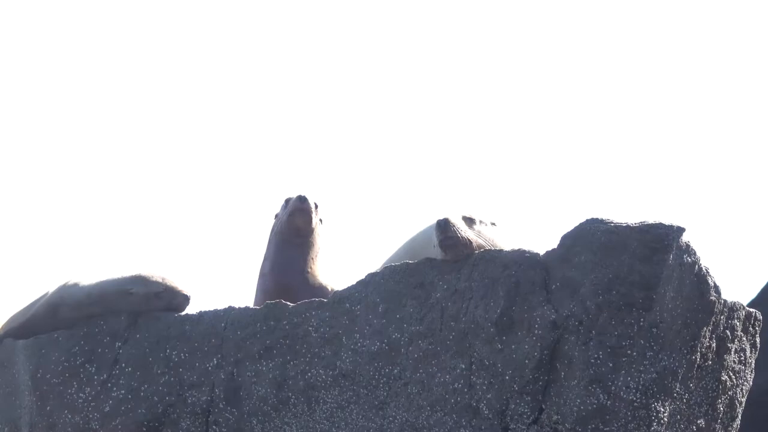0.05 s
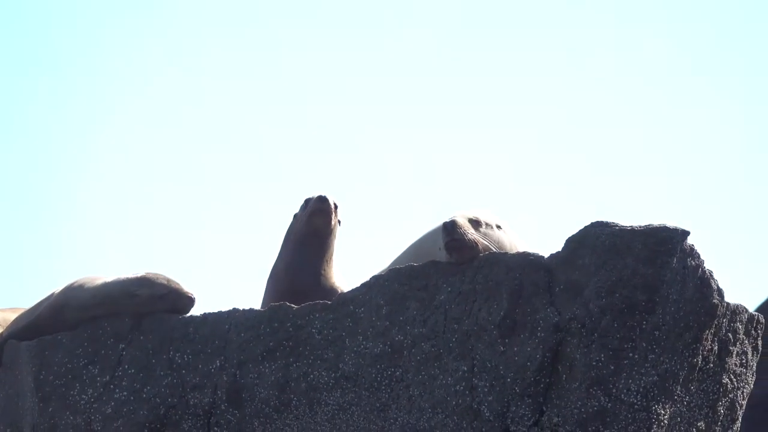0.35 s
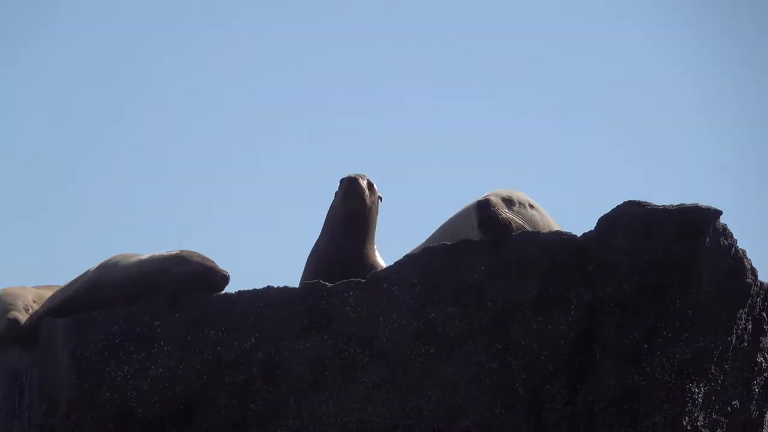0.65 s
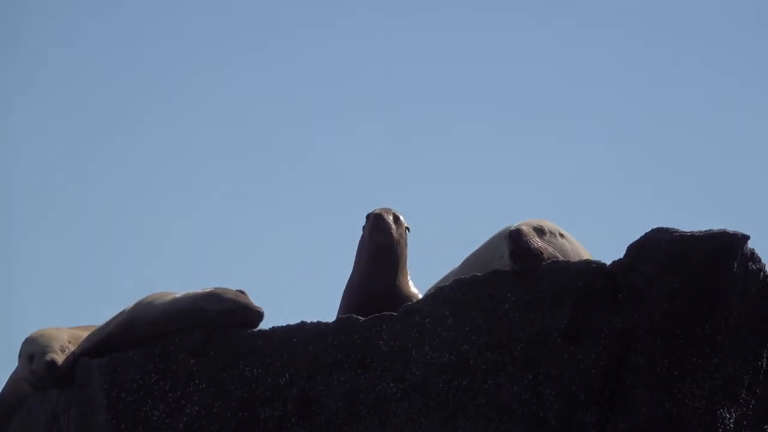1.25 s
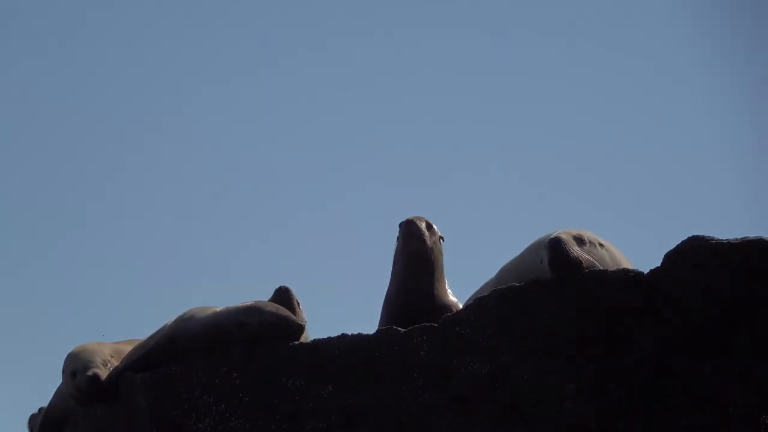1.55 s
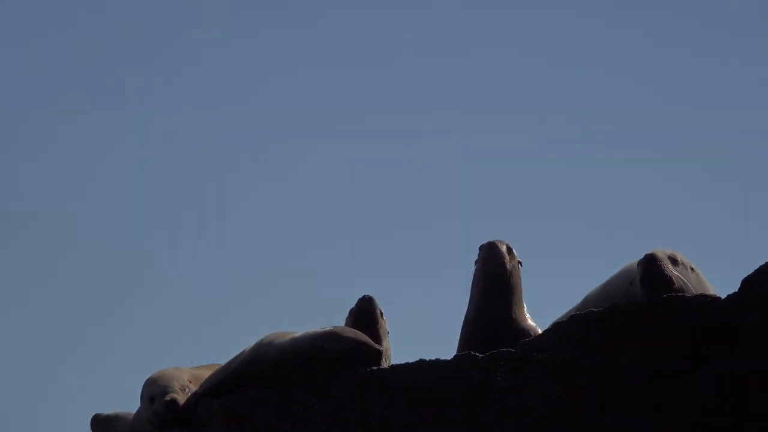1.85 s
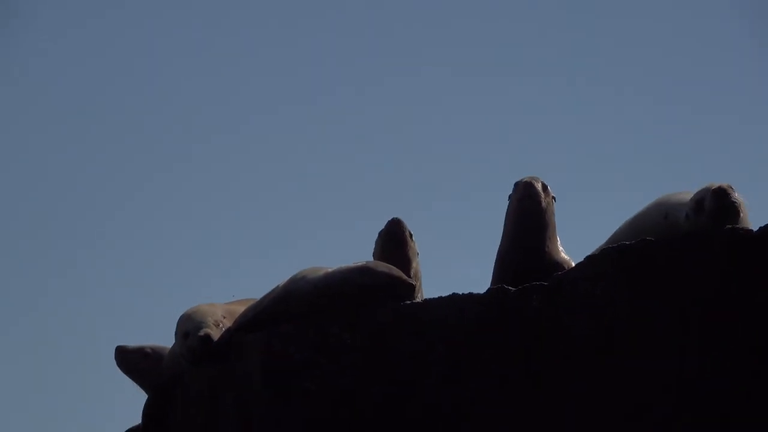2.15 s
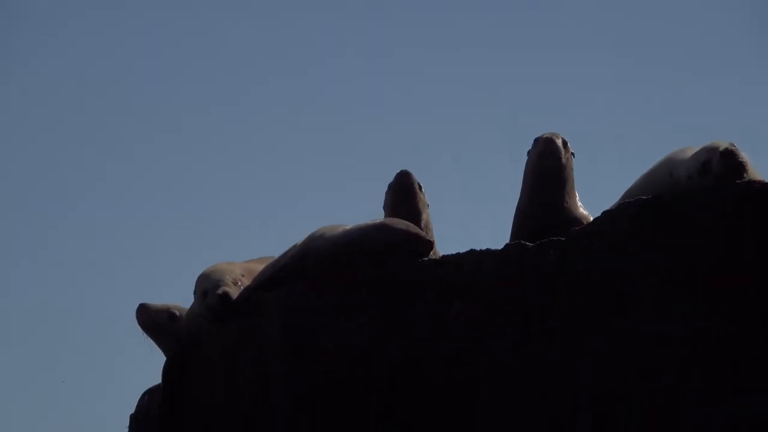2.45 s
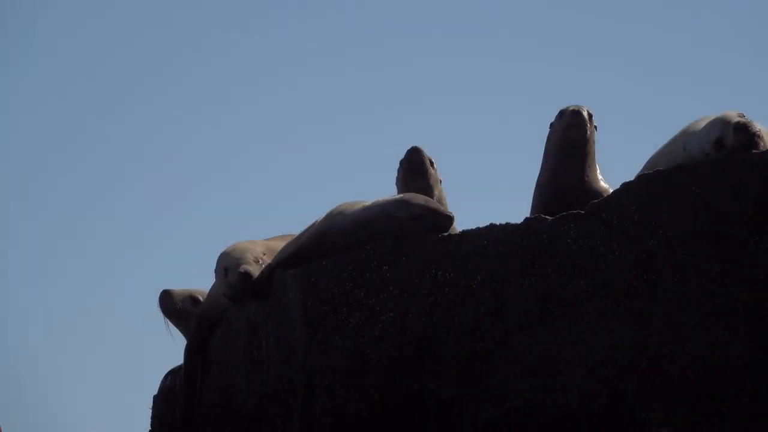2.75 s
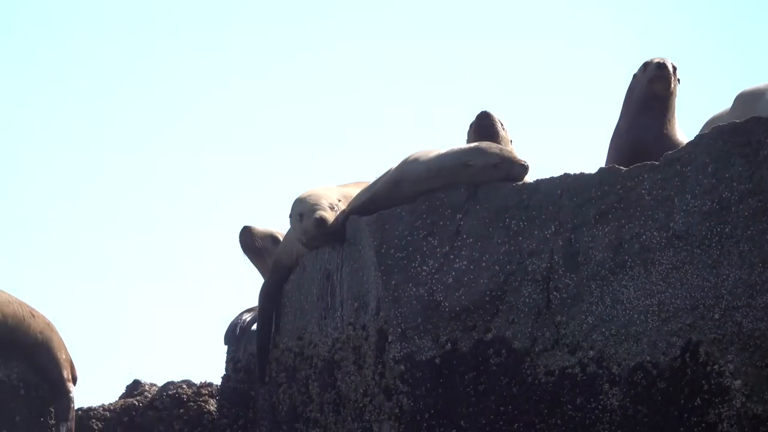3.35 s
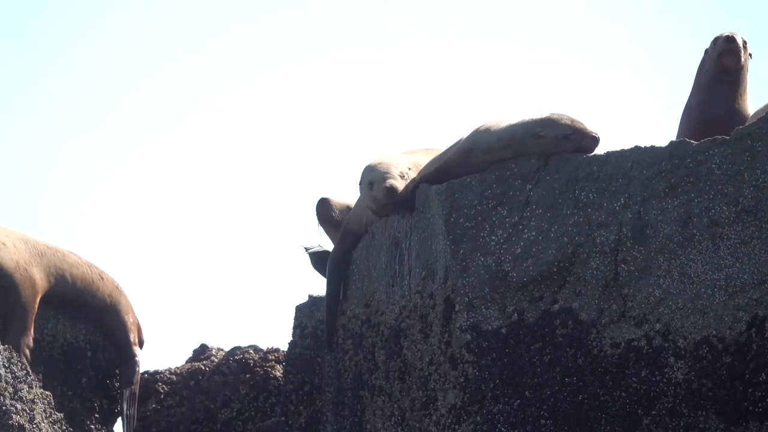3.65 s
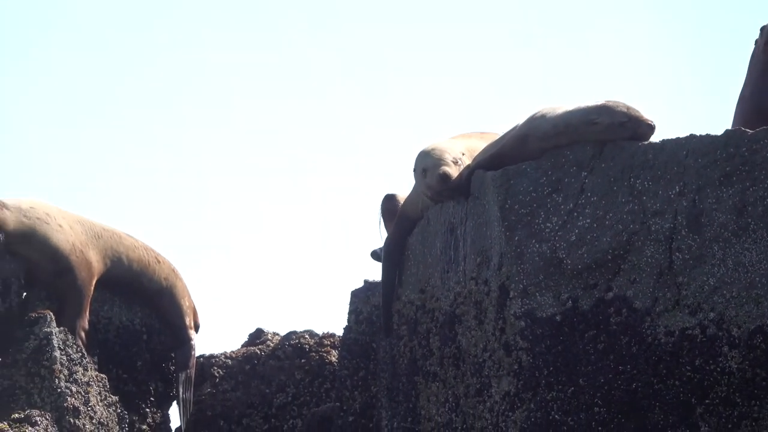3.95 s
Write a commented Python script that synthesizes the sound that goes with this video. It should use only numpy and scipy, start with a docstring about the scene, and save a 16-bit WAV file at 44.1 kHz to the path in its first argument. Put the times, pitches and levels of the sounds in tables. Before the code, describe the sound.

A boat engine idles throughout, heard from aboard, its low burbling exhaust swelling and sinking with irregular chugs and deep glugs. Water washes and gulps at the hull from the start, over faint foam hiss and light wind. Small splashes come between about 1.2 and 2.3 seconds. Wavelets slap the hull four times from 2.2 to 2.8 seconds, then the chugging idle carries on until 4 seconds.

```python
"""Aboard a boat idling close to sea rocks. From the start a wet exhaust swells and sinks as the hull
rocks, with a faint whirr above it, over a bed of wash, foam, churn, thin hiss and breeze. At once water
gulps at the hull, the engine chugs and air pockets glug; all three keep coming back. Spray first
sizzles at 0.6 s, and small splashes come in just after 1 s. Between 2.2 and 2.8 s wavelets slap the
hull four times, then the idle carries on with a few more chugs and glugs."""
import sys
import numpy as np
from scipy import signal
from scipy.fft import rfft, irfft
from scipy.io import wavfile

SR = 44100
rng = np.random.default_rng(int(sys.argv[2]) if len(sys.argv) > 2 else 0)


def to_wav(sig):
    """Store sig (one row per channel, or 1-D mono) as 16-bit WAV at the path in sys.argv[1].

    Samples outside -1..1 are clipped; the rate is SR.
    """
    pcm = np.clip(np.atleast_2d(sig), -1, 1) * 32767
    pcm = np.round(pcm).astype(np.int16)
    wavfile.write(sys.argv[1], SR, pcm.T)  # frames by channels


N = 176400
T = np.arange(N) / SR
HZ = np.maximum(np.arange(N // 2 + 1) * SR / N, 1)
SIDES = np.array([[1], [-1]])   # left, right
FIRING_HZ = 43.0
ENGINE_PAN_DB, HULL_PAN_DB, PHASE_SPREAD_RAD = 2.0, -3.5, 1.1


def from_db(db):
    """Decibels to gain."""
    return 10 ** (np.asarray(db) / 20)


def rms_one(x):
    """Scale to unit rms."""
    return x / np.sqrt(np.mean(x ** 2) + 1e-20)


def in_time(rows):
    """A fader ride read at every sample."""
    return np.interp(T, *np.transpose(rows))


def at_hz(points):
    """An EQ curve read at every frequency."""
    hz, db = np.transpose(points)
    return np.interp(np.log(HZ), np.log(hz), db)


def colour(points):
    """Gain by frequency, rolling off beyond the ends of an EQ curve."""
    inside = np.minimum(HZ / points[0][0], points[-1][0] / HZ)
    return from_db(at_hz(points)) * np.minimum(1, inside) ** 2


def peak(hz, width_hz):
    """Gain by frequency of a resonance."""
    return 1 / (1 + 2 * ((HZ - hz) / width_hz) ** 2)


def pan(db):
    """Left and right gains for a left-minus-right level."""
    return from_db(SIDES * db / 2)


def drift(rate_hz):
    """Slow random wobble of unit rms."""
    return rms_one(irfft(rfft(rng.standard_normal(N)) / (1 + (HZ / rate_hz) ** 2), N))


def ring(clicks, hz, t60):
    """Clicks set a damped resonance ringing."""
    r, w = from_db(-60 / (t60 * SR)), 2 * np.pi * hz / SR
    return signal.lfilter([1, -r * np.cos(w)], [1, -2 * r * np.cos(w), r * r], clicks + 1e-18)


def swell(age, width_s):
    """Smooth rise and fall round age zero."""
    return np.exp(-np.minimum((age / width_s) ** 2, 50))


def burst(age, attack_s, t60):
    """Quick attack, exponential tail."""
    age = np.maximum(age, 0)
    return (1 - np.exp(-age / attack_s)) * from_db(-np.minimum(60 * age / t60, 200))


# Stereo width of the ambience: f/Hz, side minus mid/dB
STEREO_WIDTH = [(60, -12.5), (130, -6.5), (240, 1), (350, -7.5), (620, -3), (800, -12.5), (1500, -10),
                (2200, -3), (3500, -2), (5500, 4), (8000, -2), (10500, -9.5), (15000, -4)]
# Its balance: f/Hz, left minus right/dB
STEREO_LEAN = [(80, -2), (170, -3.5), (250, 3.5), (360, -5), (500, 0.5), (700, -3), (1450, 0), (1850, -3),
               (6000, -2), (11000, -1)]
def diffuse(gain):
    """Stereo noise of a given colour, arriving from all round; unit rms."""
    mid, side = rfft(rng.standard_normal((2, N)))
    width = from_db(at_hz(STEREO_WIDTH))
    spread = (mid + width * side * SIDES) / np.sqrt(1 + width ** 2)
    return rms_one(irfft(gain * pan(at_hz(STEREO_LEAN)) * spread, N))


def patchy(gain, depth_db, rate_hz, bands=7):
    """Diffuse noise whose bands each flicker on their own."""
    spectrum, out = rfft(diffuse(gain)), 0
    place = np.interp(np.log(HZ), np.log([200, 6000]), [0, bands - 1])
    for k in range(bands):
        band = irfft(spectrum * np.maximum(0, 1 - abs(place - k)), N)
        out += band * from_db(depth_db * drift(rate_hz))
    return rms_one(out)


# Fader ride of the exhaust as the boat rocks: t/s, relative level/dB
EXHAUST_RIDE = [(0, -42), (0.05, -33.5), (0.25, -30.5), (0.4, -30.5), (0.54, -37.5), (0.7, -29),
                (0.88, -31), (0.94, -40), (1.15, -35), (1.38, -37), (1.55, -29.5), (1.7, -35),
                (1.92, -31.5), (2.19, -34.5), (2.42, -34), (2.67, -33), (2.77, -33.5), (2.92, -39.5),
                (3.1, -31), (3.32, -40.5), (3.48, -34), (3.62, -39), (3.74, -30.5), (4, -38)]
def engine():
    """The idle: puffs, hum, burble and rumble swell and sink together as the hull rocks."""
    level_db = in_time(EXHAUST_RIDE)
    swing_db = level_db - level_db.mean()
    firings = firing_count()
    exhaust = puffs(firings, level_db - 4.5) + hum(firings, swing_db - 35) + burble(level_db - 5)
    return pan(ENGINE_PAN_DB) * exhaust + rumble(0.77 * swing_db - 34)


def firing_count():
    """Running count of firings; the idle speed wanders so that every chug starts on one."""
    chug_s = np.array(CHUG_HITS)[:, 0]
    counted = np.append(0, np.cumsum(np.round(np.diff(chug_s) * FIRING_HZ)))
    return FIRING_HZ * T + np.interp(T, chug_s, counted - FIRING_HZ * chug_s)


# Exhaust pipe resonances: f/Hz, relative level/dB, t60/s
PIPE_MODES = [(61.6, -24, 0.04), (86, 9, 0.059), (123, 8, 0.04), (171, -18, 0.056)]
def puffs(firings, level_db, jitter_s=0.0021, spread_db=7, band_hz=(60.5, 200.5)):
    """Each firing rings the pipe with a puff, uneven in timing and strength."""
    fired = np.flatnonzero(np.diff(np.floor(firings)))
    late, size = rng.standard_normal((len(fired), 2)).T
    onsets = np.clip(fired + (late * jitter_s * SR).astype(int), 0, N - 1)
    clicks = np.zeros(N)
    clicks[onsets] = from_db(spread_db * np.tanh(size))
    pipe = sum(from_db(db) * ring(clicks, hz, t60) for hz, db, t60 in PIPE_MODES)
    bandpass = signal.butter(3, band_hz, "band", fs=SR, output="sos")
    return from_db(level_db) * rms_one(signal.sosfilt(bandpass, pipe))


# Clean engine orders: multiple of the firing rate, relative level/dB
HUM_ORDERS = [(1, -6.5), (2, -9.5), (3, -12)]
def hum(firings, level_db, waver_db=2.0):
    """Low harmonics of the firing rate, each wavering in level."""
    out = 0
    for order, db in HUM_ORDERS:
        tone = rms_one(np.cos(2 * np.pi * round(order) * firings))
        out += from_db(db + waver_db * drift(3.6)) * tone
    return from_db(level_db) * out


# Bassy EQ of the burble: f/Hz, relative level/dB
BURBLE_EQ = [(36, -15), (55, -16), (80, 7.5), (100, -8.5), (128, -7.5), (160, -13.5)]
def burble(level_db, side_db=-3.5):
    """Exhaust gas burbles through the water."""
    mid, side = irfft(rfft(rng.standard_normal((2, N))) * colour(BURBLE_EQ), N)
    return from_db(level_db) * rms_one(mid + from_db(side_db) * side * SIDES)


# Dark EQ of the rumble: f/Hz, relative level/dB
RUMBLE_EQ = [(28, -11), (55, 12), (90, 4), (130, 6.5), (180, 2), (240, -16.5), (420, -23)]
def rumble(level_db):
    """Turbulence round the exhaust fills out the low end."""
    return from_db(level_db) * diffuse(colour(RUMBLE_EQ))


# Ringing engine parts: f/Hz, width/Hz, level/dB
WHIRR_BANDS = [(283, 19, -53.5), (320.7, 15.6, -50.5), (644.5, 33, -56.5), (1008, 27, -54),
               (1106, 39, -53.5), (1772, 62, -62.5), (2498, 17, -68.5), (3213, 47, -70)]
def whirr():
    """Engine parts ring faintly in narrow bands."""
    return sum(from_db(db) * diffuse(peak(hz, width)) for hz, width, db in WHIRR_BANDS)


# Midrange EQ of the wash: f/Hz, relative level/dB
WASH_EQ = [(250, 3.5), (450, 1), (560, 0.5), (1100, -0.5), (1450, -3), (1620, -7.5), (1930, -6.5),
           (2150, -20), (3000, -25), (4500, -35)]
# Its fader ride: t/s, relative level/dB
WASH_RIDE = [(0, -39.5), (0.3, -46), (0.41, -40), (0.53, -44.5), (0.73, -39.5), (0.84, -46.5), (1.0, -42),
             (1.4, -40.5), (1.52, -43.5), (2.2, -42.5), (2.7, -41.5), (3.3, -43), (3.42, -42), (3.7, -44),
             (3.9, -45.5), (4, -43.5)]
def wash(water_db=1.5, bubbles_db=-12.5):
    """The sea washes all round, with bubbles tucked under it."""
    eq = colour(WASH_EQ)
    water = from_db(water_db) * patchy(eq, depth_db=1.5, rate_hz=17)
    return from_db(in_time(WASH_RIDE)) * (water + from_db(bubbles_db) * bubbles(eq))


def bubbles(eq, per_s=350, pitches=24, ring_cycles=10.3):
    """Small bubbles burst at random, each pitch panned to a place of its own."""
    out = 0
    for hz in np.geomspace(600, 3200, pitches):
        onsets = rng.integers(0, N, int(per_s * N / SR / pitches))
        size_db = 0.73 * np.minimum(rng.exponential(1, len(onsets)), 3)
        clicks = np.zeros(N)
        clicks[onsets] = from_db(size_db) * rng.choice([-1, 1], len(onsets))
        out += pan(rng.normal(0, 19)) * ring(clicks, hz, ring_cycles / hz)
    return rms_one(irfft(rfft(out) * eq, N))


# Bright EQ of the foam: f/Hz, relative level/dB
FOAM_EQ = [(1500, 3.5), (2100, 1.5), (2700, -1.5), (3300, -4), (3900, -7.5), (4500, -9), (5000, -27),
           (8000, -24.5)]
# Its fader ride: t/s, relative level/dB
FOAM_RIDE = [(0, -55.5), (0.25, -59.5), (0.52, -57.5), (0.85, -56.5), (1.5, -57), (2.17, -59), (2.3, -54.5),
             (2.68, -59.5), (2.82, -56.5), (2.93, -52.5), (3.04, -56.5), (3.3, -56), (3.6, -58.5), (4, -60)]
def foam(trim_db=3.5):
    """Foam fizzes above the wash."""
    return from_db(in_time(FOAM_RIDE) + trim_db) * patchy(colour(FOAM_EQ), depth_db=1.8, rate_hz=9.4)


# Low-mid EQ of the churn: f/Hz, relative level/dB
CHURN_EQ = [(110, -14), (185, 0.5), (330, -3.5), (400, -5.5), (450, -22.5), (650, -17)]
# Its fader ride: t/s, relative level/dB
CHURN_RIDE = [(0, -44.5), (0.42, -31), (0.55, -38), (0.75, -41), (0.93, -39.5), (1.17, -30.5), (1.36, -39),
              (1.62, -31.5), (1.74, -36.5), (1.86, -37), (2.1, -35.5), (2.25, -34), (2.38, -39.5),
              (2.65, -37), (3.2, -41), (4, -40)]
def churn(trim_db=-2.5):
    """Water churns at the hull in surges."""
    water = patchy(colour(CHURN_EQ), depth_db=2.0, rate_hz=12.4)
    return from_db(in_time(CHURN_RIDE) + trim_db) * water


# Airy EQ of the hiss: f/Hz, relative level/dB
HISS_EQ = [(2500, 2), (4800, 2), (6500, 0), (9500, -0.5), (13500, -3.5), (15700, -6.5)]
# Its fader ride: t/s, relative level/dB
HISS_RIDE = [(0.1, -64), (0.28, -68.5), (0.33, -66), (0.72, -63.5), (0.8, -67.5), (1.17, -64),
             (1.93, -66.5), (2.02, -65), (3.0, -64), (3.58, -64), (3.93, -67), (3.98, -64)]
def hiss(trim_db=4, waver_db=1.0):
    """Thin treble hiss that wavers slightly."""
    return from_db(in_time(HISS_RIDE) + trim_db + waver_db * drift(16)) * diffuse(colour(HISS_EQ))


# Sub-heavy EQ of the breeze: f/Hz, relative level/dB
BREEZE_EQ = [(10, 22), (28, 15), (60, 9), (120, -17)]
def breeze(level_db=-46.5, gust_db=0.93):
    """A light breeze buffets the microphone."""
    return from_db(level_db + gust_db * drift(1)) * diffuse(colour(BREEZE_EQ))


# Hollow gulps at the hull: t/s, relative level/dB, starting f/Hz
GULP_HITS = [(0.04, -24.5, 343), (0.206, -27, 368), (0.343, -29, 228), (.79, -30, 385), (1.137, -26.5, 276),
             (1.158, -28, 331), (1.528, -22.5, 362), (1.607, -25, 306), (1.625, -22, 179),
             (2.095, -26.5, 360.3), (2.466, -27.5, 357), (2.571, -25.5, 344), (2.615, -24, 358),
             (2.665, -22.5, 174.6), (2.72, -28, 322), (2.752, -23, 333), (3.575, -27, 369)]
def gulps(count=4, rise_per_s=0.79, scatter_s=0.02013, lead_db=6, trail_db=-6.5):
    """Each gulp is one big bubble, rising in pitch, trailed by a few quieter ones."""
    out, age = np.zeros((2, N + SR)), T[:SR // 4]
    envelope = burst(age, attack_s=0.008, t60=0.069)
    sweep = age + rise_per_s * age ** 2 / 2
    for s, db, hz in GULP_HITS:
        for k, (late, detune, turn) in enumerate(rng.random((count, 3))):
            pitch = hz * 2 ** (.5 * (detune - .5)) if k else hz
            start = int((s + late * scatter_s if k else s) * SR)
            gain = from_db(db + (trail_db if k else lead_db))
            phase = 2 * np.pi * pitch * sweep + PHASE_SPREAD_RAD * (turn - .5) * SIDES
            out[:, start:start + len(age)] += gain * envelope * np.sin(phase)
    return pan(HULL_PAN_DB) * out[:, :N]


# Heavy exhaust chugs: t/s, level/dB, firings in a row
CHUG_HITS = [(.064, -20, 1), (.134, -17, 1), (.18, -27.5, 4), (0.363, -42, 2), (.714, -22.5, 1),
             (.76, -24.5, 6), (1.415, -24, 1), (1.464, -19.5, 1), (1.508, -27, 1), (1.557, -22.5, 1),
             (1.774, -26.5, 2), (1.843, -18.5, 1), (1.913, -20, 1), (2.425, -18, 1), (2.495, -26, 1),
             (2.563, -22, 3), (3.067, -31, 2), (3.136, -23, 1), (3.205, -23, 1), (3.712, -23, 2),
             (3.921, -22.5, 1)]
def chugs(hz=89.3, width_s=.008):
    """The exhaust breaks free of the water, and each firing lands as a short round thud."""
    out = 0
    for s, db, run in CHUG_HITS:
        for k in range(round(run)):
            age = T - s - k / FIRING_HZ
            out += from_db(db) * swell(age, width_s) * np.cos(2 * np.pi * hz * age)
    return pan(ENGINE_PAN_DB) * out


# Deep glugs, each at its crest: t/s, level/dB, f/Hz
GLUG_HITS = [(.17, -23.5, 129), (0.608, -28, 76), (.85, -21.5, 125.2), (1.299, -26.5, 126),
             (1.788, -23, 84.5), (2.098, -24.5, 79.2), (3.09, -26.5, 80.7), (3.678, -27, 78)]
def glugs(width_s=0.044):
    """A big air pocket booms; its pitch arches up and down with its loudness."""
    sag = 0.046   # share of the pitch lost one width from the crest
    out = 0
    for s, db, hz in GLUG_HITS:
        age = T - s
        turns = hz * age * (1 - sag * (age / width_s) ** 2 / 3)
        stereo_phase = PHASE_SPREAD_RAD * (rng.random() - .5) * SIDES
        out += from_db(db) * swell(age, width_s) * np.cos(2 * np.pi * turns + stereo_phase)
    return out


# Sizzles of spray: t/s, level/dB
SPRAY_HITS = [(.598, -66), (.72, -72), (1.155, -65), (2.485, -69)]
def spray():
    """Spray sizzles softly at the very top end."""
    envelope = sum(from_db(db) * swell(T - s, width_s=.024) for s, db in SPRAY_HITS)
    return envelope * diffuse(peak(hz=13450, width_hz=2500))


# Small splashes: t/s, relative level/dB, f/Hz
SPLASH_HITS = [(1.168, -36.5, 776), (1.492, -34.5, 1010), (1.669, -32.5, 1143), (2.298, -36, 1114)]
def splashes(trim_db=2.5, bubble_db=-7.5):
    """Each splash is a puff of spray round one ringing bubble."""
    out = 0
    for s, db, hz in SPLASH_HITS:
        bubble = from_db(bubble_db) * np.sin(2 * np.pi * hz * (T - s))
        puff = diffuse(peak(hz, width_hz=210))
        out += from_db(db + trim_db) * burst(T - s, attack_s=0.0038, t60=0.088) * (bubble + puff)
    return out


# Hollow slaps on the hull: t/s, relative level/dB, f/Hz
SLAP_HITS = [(2.212, -19, 205), (2.283, -19, 361), (2.307, -22.5, 314), (2.767, -25, 347)]
def slaps(splash_db=-8):
    """A wavelet closes on the hull with a sharp, quickly damped knock and a dull splash."""
    out = 0
    for s, db, hz in SLAP_HITS:
        knock = np.sin(2 * np.pi * hz * (T - s))
        splash = from_db(splash_db) * diffuse(peak(hz, width_hz=61))
        out += from_db(db) * burst(T - s, attack_s=.0015, t60=0.061) * (knock + splash)
    return pan(HULL_PAN_DB) * out


def scene():
    """The bed of engine, sea and air, then the spot sounds in order of entry."""
    bed = engine() + whirr() + wash() + foam() + churn() + hiss() + breeze()
    return bed + gulps() + chugs() + glugs() + spray() + splashes() + slaps()


def record(dry):
    """Click-free fades at both ends and a steep high cut."""
    fade_s, cutoff_hz = .004, 15720
    from_edge_s = np.minimum(T, T[::-1])
    fade = np.sin(np.pi / 2 * np.minimum(1, from_edge_s / fade_s)) ** 2
    return signal.sosfilt(signal.ellip(12, .1, 90, cutoff_hz, fs=SR, output="sos"), dry * fade)


dry = scene()
out = record(dry)
to_wav(out)
```